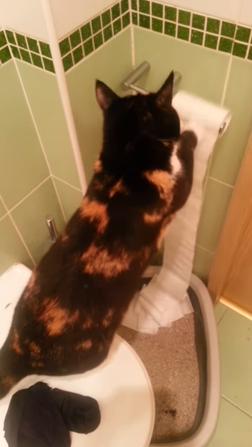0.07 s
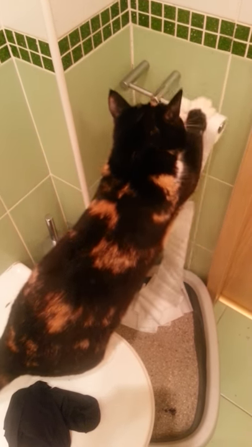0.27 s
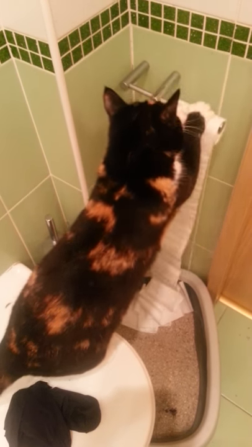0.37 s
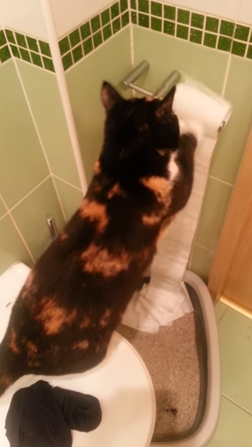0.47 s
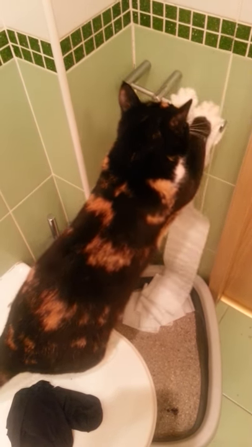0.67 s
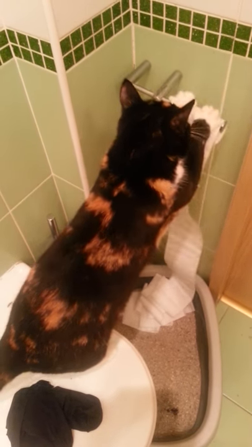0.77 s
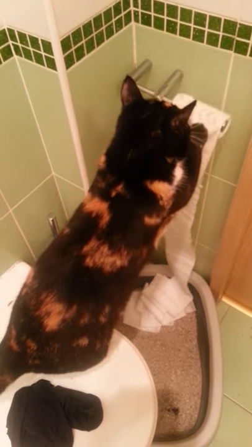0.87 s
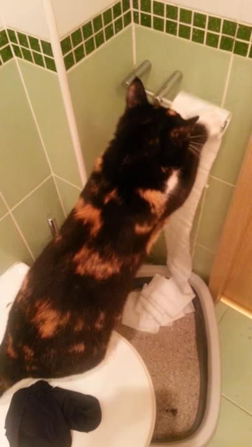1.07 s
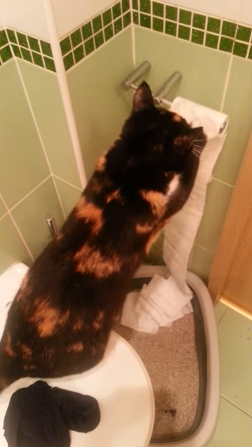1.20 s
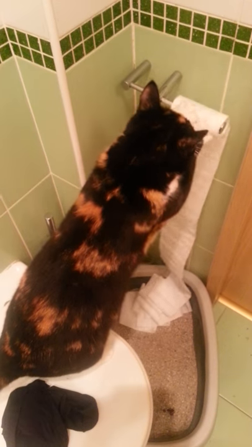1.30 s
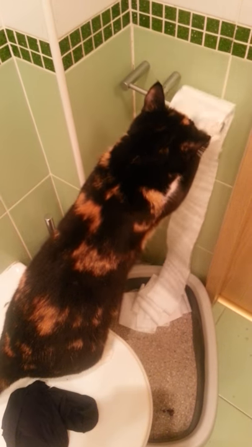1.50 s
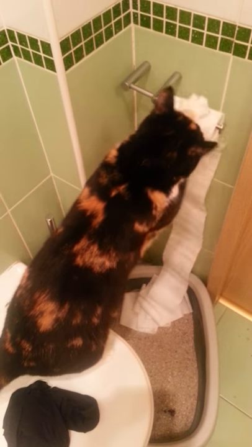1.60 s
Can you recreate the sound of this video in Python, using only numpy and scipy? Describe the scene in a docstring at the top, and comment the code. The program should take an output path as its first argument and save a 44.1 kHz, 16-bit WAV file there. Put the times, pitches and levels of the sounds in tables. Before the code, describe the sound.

Crisp paper rustling and claw snaps burst out early with dull rattling thumps of the roll on its bar, then fade to sparse light crinkles; short tiled-room reflections, faint hiss, close two-microphone phone pickup.

```python
"""A cat paws a paper roll on its holder in a small tiled bathroom, heard by a two-microphone phone.
It opens with faint crinkle and thumps; from 0.19 s to 0.8 s the claws work hard, the sharpest snap at 0.26 s.
After a near lull come light rustles, low thumps near 1.2 s and a last stir with snaps from 1.49 s.
Paper is dense random clicks plus snap bursts; the roll's pushes and rumble ring a set of low modes.
Tiles add a short noise tail to the paper; faint hiss lies under all."""
import sys
import numpy as np
from scipy import signal
from scipy.fft import rfft, irfft
from scipy.io import wavfile
from scipy.ndimage import uniform_filter1d

SR = 44100
rng = np.random.default_rng(int(sys.argv[2]) if len(sys.argv) > 2 else 0)


def store_pcm(level_fs):
    """Save levels as 16-bit WAV."""
    pcm = np.round(np.clip(level_fs, -1, 1) * 32767).astype(np.int16)
    wavfile.write(sys.argv[1], SR, np.atleast_2d(pcm).T)


N = 72765

# Paper rustle, one list per stir: (time [s], bright crinkle level [dB],
# dull scrape re crinkle [dB], roll rumble re crinkle [dB])
RUSTLE_STIRS = [
    [(0.0, -59.5, -21, 9), (0.006, -85, 20, 13.5), (0.05, -93, -15, 9), (0.068, -60.5, -8, -2.5),
     (0.1, -73, -14, -15), (0.11, -59, -13, -13)],
    [(0.115, -58.5, -11, -7.5), (0.145, -53.5, -10.5, -10), (0.169, -60, -5, -8), (0.179, -55.5, -7, 3.5),
     (0.184, -49, -10, 7)],
    [(0.187, -36, -4, -6.5), (0.221, -50, -6.5, -3.5), (0.251, -43, 3, 10.5), (0.254, -40, -9, -3)],
    [(0.258, -28.5, -3.5, -18), (0.284, -32.5, -11.5, -7), (0.46, -71, -7, -4.5)],
    [(0.475, -48.5, -10.5, -18), (0.509, -51, -11.5, -13), (0.577, -49.5, 2, 4), (0.621, -41.5, -6.5, -6),
     (0.629, -37, -5, -16), (0.66, -42.5, -3.5, 1.5)],
    [(0.67, -42, -4.5, 7), (0.692, -32.5, -2, -9), (0.702, -37.5, -1, -7), (0.782, -54, -3.5, 3),
     (0.842, -96, 9, 13), (0.85, -89, 8, 25)],
    [(0.87, -60.5, -6, -4), (0.916, -71.5, -1, -4), (0.944, -57.5, -9, -11), (1.052, -77, -13, -11),
     (1.08, -58.5, -10, -20), (1.11, -64.5, -2.5, -21)],
    [(1.125, -64.5, -17, -17), (1.145, -52, -10, -13), (1.159, -47.5, -2.5, -12), (1.195, -53, -4.5, -5.5),
     (1.309, -85, -4, 9), (1.41, -91, -16, -20)],
    [(1.42, -77, 2, -23), (1.448, -54, -11.5, -10), (1.48, -53, -10.5, -17), (1.486, -47, -12.5, -16.5),
     (1.516, -56, -7.5, -7.5), (1.585, -94, -14, 13)],
    [(1.595, -79, -10, 19.5), (1.603, -58, -13, -8), (1.635, -42.5, -11, -12), (1.65, -48, -11, 1)],
]
# Claw snaps in the paper: (time [s], level [dB], dull part re level before its fixed gain [dB])
CLAW_SNAPS = [(0.1859, -26.5, -5), (0.2342, -30, -3), (0.2404, -32, -16), (0.249, -48, -28),
              (0.2565, -14, -10.5), (0.2583, -16.5, -24), (0.473, -56, -10), (.4903, -41, -6),
              (0.5513, -31, 0.5), (0.6287, -32.5, -30), (.632, -30, 2), (0.6783, -25, 0), (0.688, -22, -8),
              (0.6932, -67, -6), (1.1569, -46.5, 2), (1.487, -35, -19), (1.4955, -42, -19),
              (1.509, -58, -1), (1.6201, -52.5, 8), (1.6331, -38.5, 3)]
# Thumps of the roll on its bar: (centre time [s], push level [dB], push pitch [Hz])
ROLL_THUMPS = [(.005, -55.5, 200), (0.174, -57, 198), (.195, -77, 303), (0.213, -43.5, 189),
               (.243, -34.5, 192), (.262, -37.5, 376), (.275, -37.5, 460), (.285, -45, 338),
               (0.286, -31, 156), (0.299, -32.5, 138), (0.347, -60, 150), (0.439, -48, 161),
               (0.526, -43.5, 149), (.555, -34.5, 196), (.582, -36.5, 184), (0.61, -32.5, 146),
               (0.633, -31, 162), (.655, -29.5, 173), (.67, -73, 544), (0.687, -32.5, 191),
               (.702, -36, 163), (0.716, -36, 273), (0.746, -56, 272), (0.784, -42, 205),
               (.805, -57.5, 280), (0.902, -53, 180), (1.179, -50.5, 195), (1.194, -53, 580),
               (1.201, -43, 78.4), (1.241, -39, 78), (1.215, -62, 285), (1.234, -57, 148),
               (1.263, -54, 150), (1.289, -57, 146), (1.315, -65, 148), (1.45, -73, 293),
               (1.503, -49.5, 160), (1.542, -74, 139), (1.631, -61, 284)]
# Low modes of the small bathroom, rung by the roll: (frequency [Hz], gain [dB], T60 [s], left minus right [dB])
ROOM_MODES = [(75.1, -6.5, 0.088, 0.5), (152.2, -3, 0.27, 1), (187.8, 0.5, 0.14, 0.), (223, -13, 0.04, 0.),
              (267.8, -2.5, 0.14, -.5), (296.4, -0.5, 0.23, 2.5), (325.3, -6, 0.16, -7.5),
              (402.5, 0, 0.091, -4), (440.4, -6, 0.18, 7), (483, -1, 0.061, 1.5), (544, -3, 0.12, -4),
              (671, -17, 0.071, -6.5)]
# Bright paper spectrum: (frequency [Hz], relative density [dB per Hz])
BRIGHT_SPECTRUM = [(1410, -50.5), (2400, -14.5), (3430, -12), (4300, -4), (5600, 0), (7020, 0),
                   (9430, -11.5), (12400, -18), (14400, -32.5), (15400, -62)]
# Dull paper spectrum: (frequency [Hz], relative density [dB per Hz])
DULL_SPECTRUM = [(350, -24), (600, -16), (723, -5), (918, 1), (1020, -5), (1270, -1), (1880, -4),
                 (2250, -10), (2800, -12.5), (3640, -24), (6160, -120)]
# Microphone port colour: (frequency [Hz], left minus right [dB])
PORT_BALANCE = [(700, -0.5), (2400, 0), (4400, -1.5), (5500, -4.5), (6500, 7.5), (7500, 10.5), (9000, 5),
                (11000, 3), (15000, 3)]
# Hiss spectrum: (frequency [Hz], relative density [dB per Hz])
HISS_SPECTRUM = [(20, 5), (55, -5), (85, 2), (170, 3.5), (400, -3), (1000, -9), (2400, -11), (4000, -10),
                 (6800, -1.5), (9000, -12.5), (12000, -12.5), (14300, -16.5), (15400, -32)]

CRACKS_PER_S, CRACK_MEAN_EXCESS_DB = 7000, 2.5
FLICKER_RMS_DB, FLICKER_WINDOW_S = 1.3, 1 / 60
SNAP_DECAY_S, DULL_SNAP_GAIN = 0.0016, 5
DIRECT_RUSTLE_GAIN, SCATTER_GAIN = 0.5, 0.84  # crinkle common to both microphones, and unrelated
RUSTLE_WET_DB, SNAP_WET_DB = -3, -4.5
BRIGHT_T60_S, DULL_T60_S, FIRST_ECHO_S = 0.21, 0.2, 0.0022
PUSH_CYCLES, RUMBLE_GAIN = 4, 0.041  # push width between 1/e points
BASS_CUT_HZ, TOP_HZ = 127, 15300
RIGHT_LATE_S = 0.0003117
IN_STEP_HZ = 400  # modes well below this reach both microphones together
HISS_DB = -59  # before suppressor and gate
QUIET_CUT_DB, OVER_HISS_DB, STFT_SAMPLES = -6.5, 1, 1024
GATE_OPEN_DB, GATE_SLOPE_DB_PER_DB, GATE_DEPTH_DB, GATE_WINDOW_S = -51, 0.42, -5.5, 0.029


def paper():
    """Crinkle and snaps, each in a bright and a dull band, direct and reflected by the tiles."""
    bright_db = rustle_curve(1)
    levels_db = bright_db, bright_db + rustle_curve(2)
    spectra, t60s = (BRIGHT_SPECTRUM, DULL_SPECTRUM), (BRIGHT_T60_S, DULL_T60_S)
    out = 0
    for level_db, snap, spectrum, t60_s in zip(levels_db, snaps(), spectra, t60s):
        gain = undb(level_db)
        rustle = gain * cracks()
        scattered = gain * np.array([cracks(), cracks()])
        direct = both_microphones(DIRECT_RUSTLE_GAIN * rustle + snap)
        to_tiles = undb(RUSTLE_WET_DB) * rustle + undb(SNAP_WET_DB) * snap
        wet = convolve(to_tiles, tiles(t60_s))
        out = out + convolve(direct + SCATTER_GAIN * scattered + wet, unit_colour(spectrum))
    return out


def cracks():
    """Dense random clicks of uneven size and sign whose strength flickers; unit RMS."""
    hit = rng.random(N) < CRACKS_PER_S / SR
    sign = np.sign(rng.standard_normal(N))
    size = undb(CRACK_MEAN_EXCESS_DB * rng.exponential(size=N)) * sign
    flicker = unit_rms(smooth(rng.standard_normal(N), round(FLICKER_WINDOW_S * SR)))
    return unit_rms(hit * size * undb(FLICKER_RMS_DB * flicker))


def snaps():
    """Each snap is a decaying bright burst of random signs over a single dull click."""
    time_s, level_db, dull_re_db = np.array(CLAW_SNAPS).T
    at = (time_s * SR).astype(int)
    bright, dull = np.zeros(N), np.zeros(N)
    bright[at] = undb(level_db)
    dull[at] = undb(level_db + dull_re_db)
    decay = np.exp(-np.arange(SR // 50) / SR / SNAP_DECAY_S)
    burst = convolve(bright, decay) * np.sign(rng.standard_normal((2, N)))
    return burst, DULL_SNAP_GAIN * dull


def rustle_curve(column):
    """One column of the stirs, interpolated linearly at every sample."""
    table = np.concatenate(RUSTLE_STIRS)
    return np.interp(np.arange(N) / SR, table[:, 0], table[:, column])


def roll():
    """Soft pushes and rumble noise drive the decaying low modes."""
    return convolve(thumps() + rumble(), mode_ring())


def thumps():
    """Each push is a cosine under a Gaussian envelope."""
    time_s, level_db, push_hz = np.array(ROLL_THUMPS).T[:, :, None]
    cycles = (np.arange(N) / SR - time_s) * push_hz
    envelope = np.exp(-(2 * cycles / PUSH_CYCLES) ** 2)
    # level scales with pitch per sample, as wider pushes drive the modes for longer
    pushes = undb(level_db) * push_hz / SR * envelope * np.cos(2 * np.pi * cycles)
    return np.sum(pushes, axis=0)


def rumble():
    """White noise whose level follows the rustle tables."""
    return RUMBLE_GAIN * undb(rustle_curve(1) + rustle_curve(3)) * rng.standard_normal(N)


def mode_ring():
    """Stereo impulse response: a sum of exponentially decaying sines."""
    t = np.arange(SR // 2) / SR
    side = np.array([[0.5], [-0.5]])
    ring = 0
    for k, (hz, gain_db, t60_s, pan_db) in enumerate(ROOM_MODES):
        offset_s = side * RIGHT_LATE_S * min(hz / IN_STEP_HZ, 1)
        level_db = gain_db + side * pan_db - 60 * t / t60_s
        polarity = (-1) ** ((k + 1) // 2)
        ring = ring + polarity * undb(level_db) * np.sin(2 * np.pi * hz * (t + offset_s))
    return ring


def tiles(t60_s):
    """Room echo tail: decaying noise, unrelated left and right, of unit energy."""
    t = np.arange(SR // 2) / SR
    tail = rng.standard_normal((2, len(t))) * undb(-60 * t / t60_s) * (t > FIRST_ECHO_S)
    return tail / np.sqrt(np.sum(tail ** 2, axis=1, keepdims=True))


def hiss():
    """Microphone and room hiss: coloured noise, unrelated left and right."""
    return undb(HISS_DB) * convolve(rng.standard_normal((2, N)), unit_colour(HISS_SPECTRUM))


def both_microphones(x):
    """The direct sound reaches the right microphone a little later."""
    left, right = np.broadcast_to(x, (2, N))
    n = np.arange(N)
    return np.array([left, np.interp(n - RIGHT_LATE_S * SR, n, right)])


def suppress(x):
    """Noise suppressor: each band is turned down as its power sinks towards the hiss."""
    spec = signal.stft(x, nperseg=STFT_SAMPLES)[2]
    hiss_shape = np.abs(rfft(unit_colour(HISS_SPECTRUM))[::2, None]) ** 2  # every second bin fits the STFT
    quiet = hiss_shape * undb(2 * (HISS_DB + OVER_HISS_DB)) / STFT_SAMPLES
    over_bands = uniform_filter1d(np.abs(spec) ** 2, size=5, axis=1)
    power = uniform_filter1d(over_bands, size=2, axis=2)
    gain = np.maximum(1 - quiet / (power + 1e-20), undb(QUIET_CUT_DB))
    return signal.istft(spec * gain, nperseg=STFT_SAMPLES)[1][:, :N]


def gate(x):
    """Expander: both channels are turned down together as the level falls under the opening level."""
    power = smooth(np.mean(x ** 2, axis=0), int(GATE_WINDOW_S * SR))
    level_db = 10 * np.log10(np.abs(power) + 1e-12)
    gain_db = np.clip(GATE_SLOPE_DB_PER_DB * (level_db - GATE_OPEN_DB), GATE_DEPTH_DB, 0)
    return x * undb(gain_db)


def undb(db):
    """Amplitude factor from dB."""
    return 10 ** (np.asarray(db) / 20)


def unit_rms(x):
    """Scale to unit RMS."""
    return x / np.sqrt(np.mean(x ** 2))


def smooth(x, samples):
    """Moving average applied twice."""
    return uniform_filter1d(uniform_filter1d(x, samples), samples)


def convolve(x, h):
    """Convolve per channel, cut to the scene length."""
    return signal.fftconvolve(np.atleast_2d(x), np.atleast_2d(h), axes=1)[:, :N]


def response(table, size=2048):
    """Minimum-phase response through (frequency [Hz], level [dB]) points, by a folded cepstrum."""
    hz, db = np.array(table, float).T
    f = np.arange(size // 2 + 1) * SR / size + 1  # +1 avoids log(0)
    cepstrum = irfft(np.log(undb(np.interp(np.log(f), np.log(hz), db))))
    cepstrum[1:size // 2] *= 2
    cepstrum[size // 2 + 1:] = 0
    return irfft(np.exp(rfft(cepstrum)))


def unit_colour(table):
    """The same response at unit energy."""
    h = response(table)
    return h / np.sqrt(np.sum(h ** 2))


def scene():
    """Paper and roll with the bass cut, over hiss."""
    # a small roll radiates little deep bass
    bass_cut = signal.butter(2, BASS_CUT_HZ, "high", fs=SR, output="sos")
    return signal.sosfilt(bass_cut, paper() + roll()) + hiss()


def record(dry):
    """Quiet bands and moments are cut, the two ports colour the treble differently, the top is cut."""
    ports = [response([(hz, side * db) for hz, db in PORT_BALANCE]) for side in (0.5, -0.5)]
    heard = convolve(gate(suppress(dry)), np.array(ports))
    top_cut = signal.ellip(8, 0.2, 70, TOP_HZ, fs=SR, output="sos")  # ripple, stopband [dB]
    return signal.sosfilt(top_cut, heard)


dry = scene()
out = record(dry)
store_pcm(out)
```